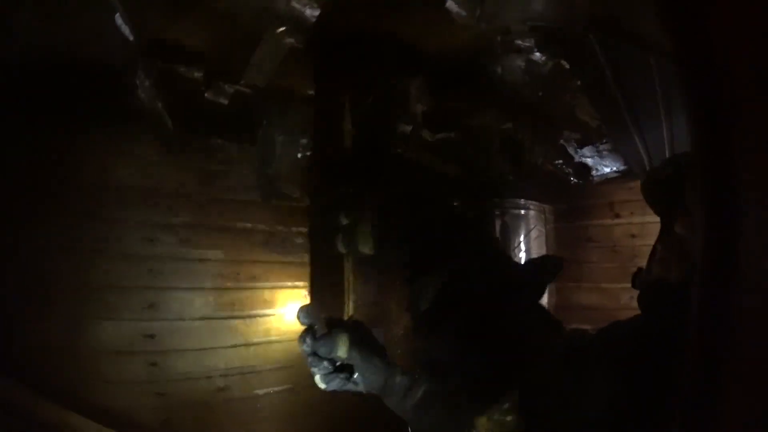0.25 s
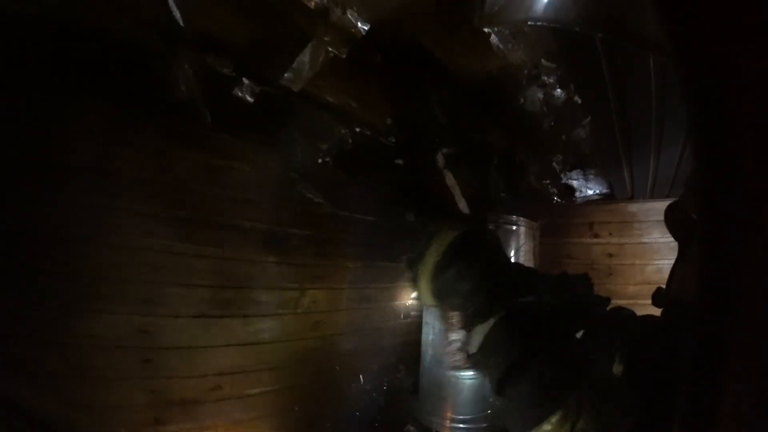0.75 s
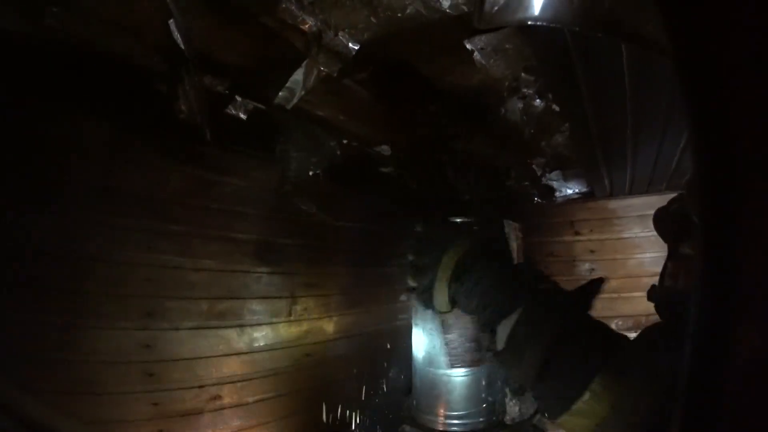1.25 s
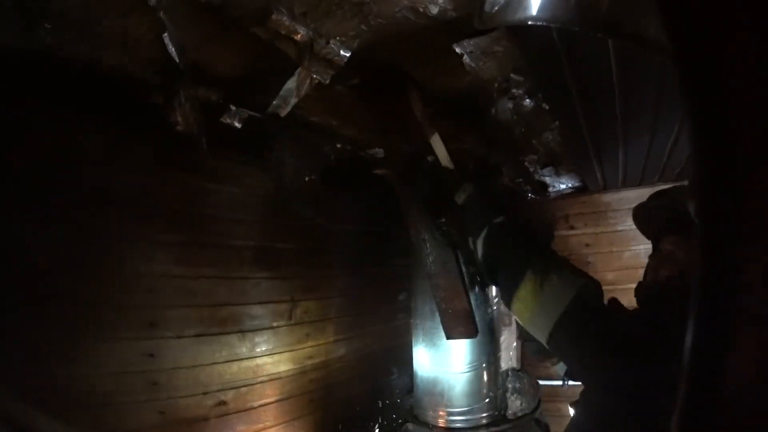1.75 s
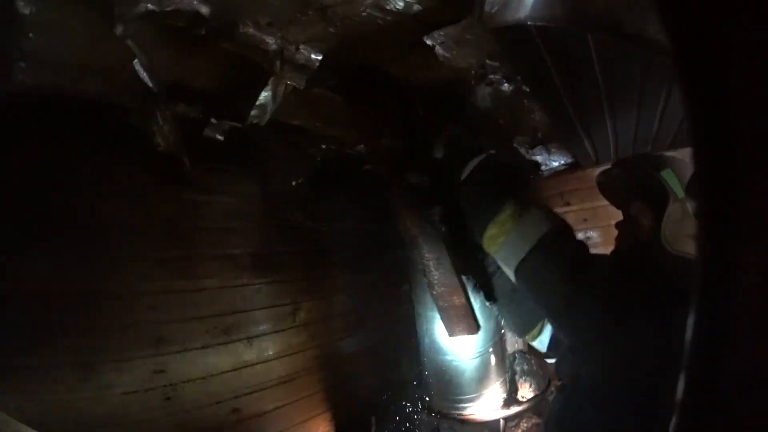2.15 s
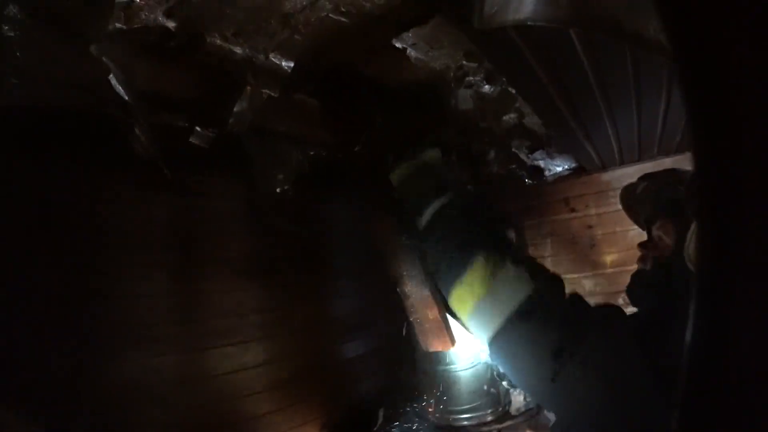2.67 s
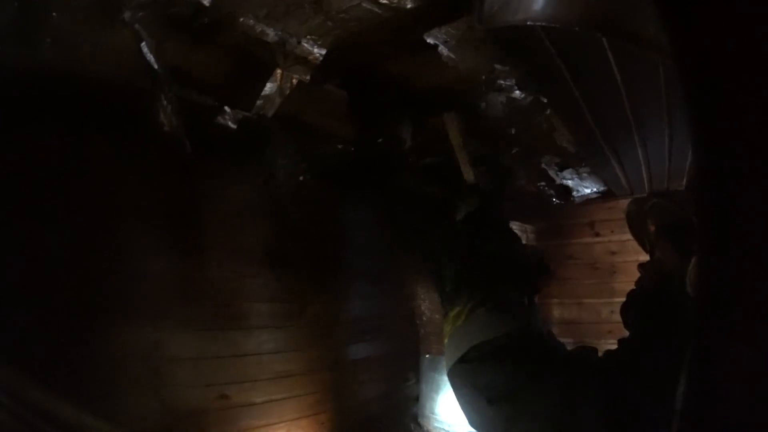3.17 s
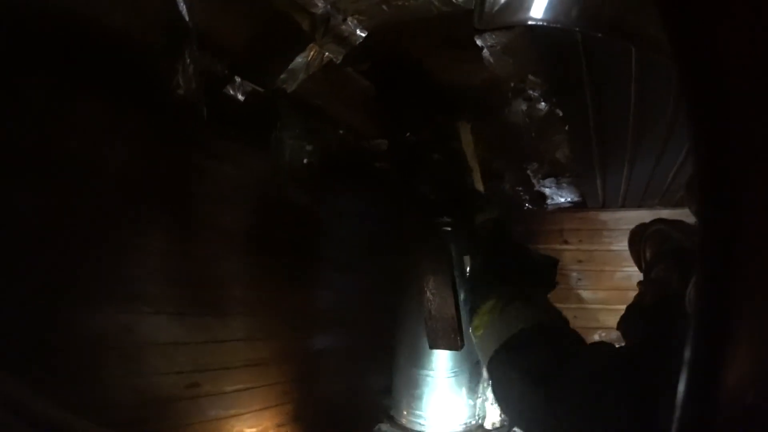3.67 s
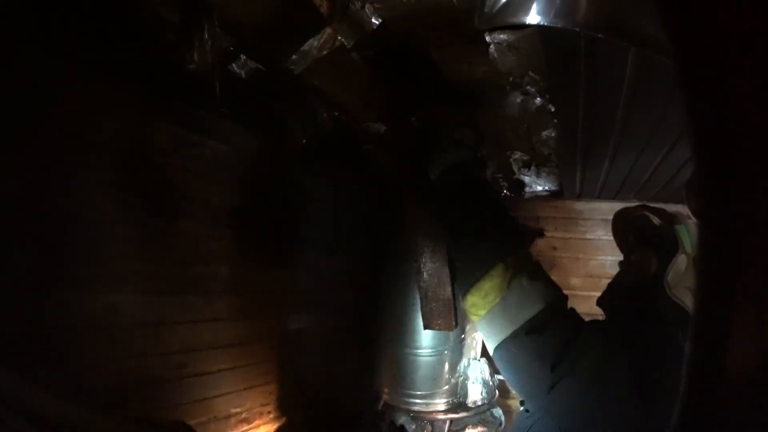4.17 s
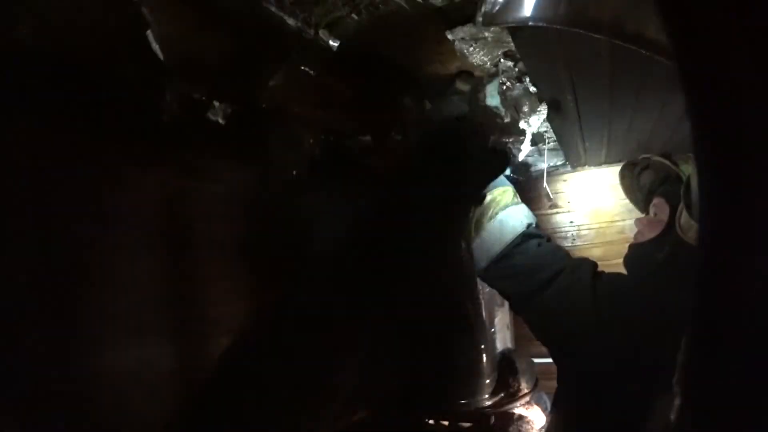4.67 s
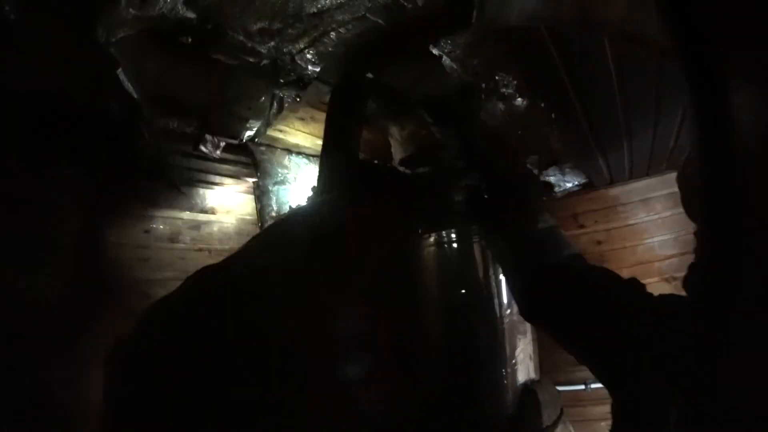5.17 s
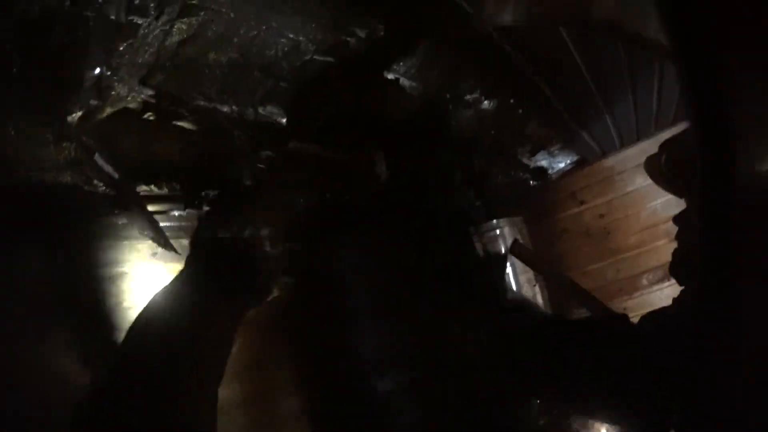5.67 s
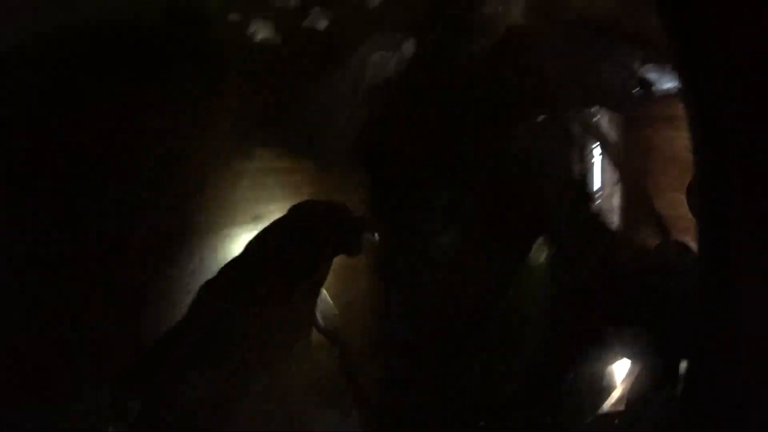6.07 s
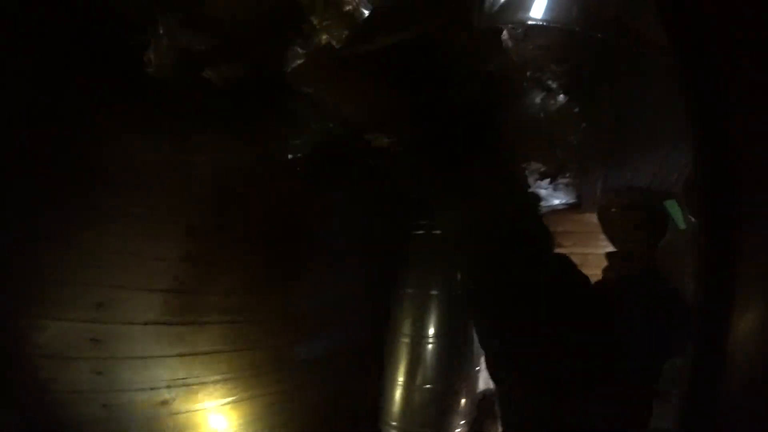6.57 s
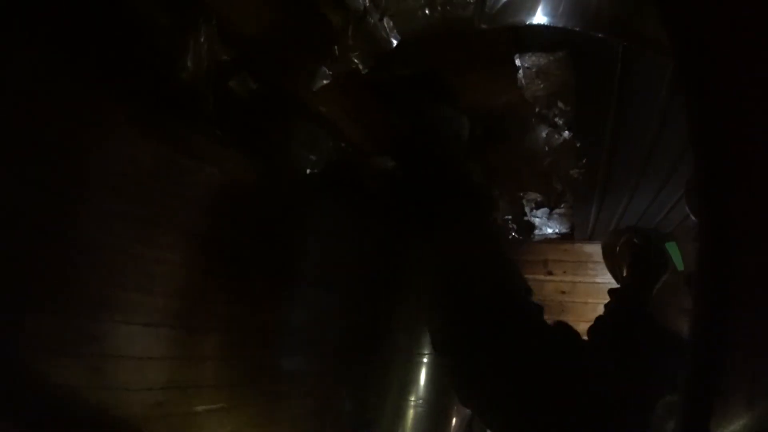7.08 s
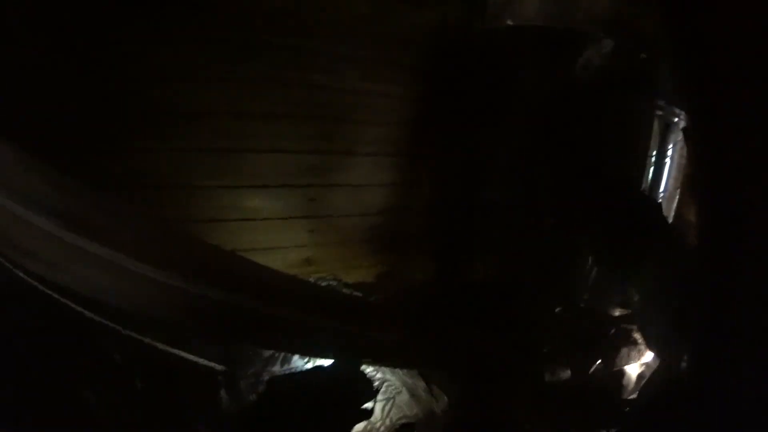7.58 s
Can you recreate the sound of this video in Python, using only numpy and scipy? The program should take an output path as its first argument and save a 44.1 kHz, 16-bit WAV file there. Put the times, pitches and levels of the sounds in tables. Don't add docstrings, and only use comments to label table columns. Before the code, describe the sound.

Close-up ceiling demolition: quick wooden knocks, snapping fibres and crackling foil, a quieter scratchy middle, then a loud cluster of blows and cracks.

```python
import sys
import numpy as np
from scipy import signal
from scipy.fft import rfft, irfft, next_fast_len
from scipy.io import wavfile
from scipy.ndimage import uniform_filter1d

SR = 44100
rng = np.random.default_rng(int(sys.argv[2]) if len(sys.argv) > 2 else 0)


def dump(signal):
    limited = np.clip(np.atleast_2d(signal).T, -1, 1)
    pcm = np.round(limited * 32767).astype(np.int16)
    wavfile.write(sys.argv[1], SR, pcm)


def nominal_scale(level):
    x = np.asarray(level, float) / 20
    return 10 ** x


N = 345303


def evened(x):
    return x / np.sqrt(np.mean(x ** 2) + 1e-20)


def read(points, hz):
    f, value = np.transpose(points)
    return np.interp(np.log(hz + 1), np.log(f + 1), value)


def add(mix, start_s, sound):
    part = mix[..., round(start_s * SR):][..., :sound.shape[-1]]
    part += sound[..., :part.shape[-1]]


def colour(x, spectrum):
    size = 4096
    gain_db = np.maximum(read(spectrum, abs(np.fft.fftfreq(size, 1 / SR))), -90)
    minimum_phase = np.exp(np.conj(signal.hilbert(np.log(nominal_scale(gain_db)))))
    taps = np.fft.ifft(minimum_phase).real[:size // 2]
    return signal.oaconvolve(x, (taps / np.linalg.norm(taps))[None], axes=-1)[..., :N]


def panned(db):
    return nominal_scale(np.array([db / 2, -db / 2]))


# (f/Hz, level/dB per Hz)
AIR = [(15, -49), (25, -0.5), (118, -23.5), (502, -13.5), (998, -16.5), (2370, -20), (7070, -19),
       (10900, -24)]


def air():
    shared, own = rng.standard_normal((1, N)), rng.standard_normal((2, N))
    same = 0.58
    return nominal_scale(-50.5) * colour(same * shared + np.sqrt(1 - same ** 2) * own, AIR)


# (t/s, peak level/dB, main pitch f/Hz, knock level re peak/dB, knock pitch f/Hz)
BLOWS = [(.169, -16, 281, 1.5, 1130), (0.468, -21, 275, -8, 1165), (0.523, -21, 306, 1.5, 1180),
         (.591, -26, 267, -16, 1560), (.713, -18.5, 258, -3.5, 1250), (.811, -21, 94, -8, 1153),
         (1.539, -28, 255, -4, 1690), (1.599, -34, 211, -30, 751), (2.127, -26.5, 123, -22, 570),
         (5.618, -4.5, 248, -15, 1200), (5.625, -9, 150, -30, 700), (3.348, -27, 321, -28, 1280),
         (3.767, -23, 241, -7, 1243), (4.059, -5.5, 265, -7, 450), (4.131, -33, 145, 2, 840),
         (5.477, -17.5, 310, -4, 1540), (5.598, -5.5, 305, -4, 812), (5.639, -7.5, 291, -16.5, 560),
         (5.964, -19.5, 349, 3.5, 1147), (6.117, -12, 148, -2, 594), (6.194, -12, 256, -0.5, 863),
         (6.714, -11.5, 265, -3, 900), (6.772, -24, 230, -1, 1360), (6.964, -37, 153, 7, 850),
         (7.312, -28, 308, -4, 1224), (.188, -20, 199, -4, 1200), (0.206, -34, 232, -10, 707),
         (4.077, -13, 150, -19, 690), (4.091, -17, 274.5, -28, 600), (4.11, -24, 150, -30, 600),
         (5.497, -20, 151, -7, 890), (5.513, -22.5, 266, -17, 694), (5.573, -20, 150, -20, 890),
         (5.654, -7.5, 310, -25, 600), (6.135, -13, 250, -1, 910), (6.745, -18.5, 202, -14, 690),
         (6.796, -20, 248, -16, 895), (0, -33, 326, -6, 960), (6.216, -17, 229, -10, 804)]
# (t/s, peak level/dB, knock pitch f/Hz)
TAPS = [(.342, -37, 1300), (2.535, -26, 778), (2.542, -32, 1900), (5.49, -15, 1800), (5.553, -22, 2070),
        (6.308, -28, 1214), (6.175, -11.5, 1123), (3.14, -39.5, 1550), (5.018, -35, 2250),
        (6.152, -16, 993), (6.385, -40, 690), (6.503, -21.5, 1116), (6.588, -27, 890), (6.617, -26, 843),
        (6.992, -22.5, 1230)]
# (f/Hz, level/dB, ring time as a share of the blow's [1])
BOARD_MODES = [(145, -2.5, 0.94), (195.5, -5, 1.25), (251.2, 1.5, 0.89), (290.8, 0.5, 0.93),
               (358.2, -3, 0.68), (454, -9.5, 0.22)]


def blows():
    out, t = np.zeros((1, N)), np.arange(SR // 3) / SR
    rise = 1 - np.exp(-t / 0.003)
    place = np.linspace(0, 1, num=14)[:, None]
    lowest_hz, highest_hz = 520, 2300
    sag, sag_s = 0.1, 0.012
    tap_db, tap_hz = -16.5, 310
    taps = [(s, db + tap_db, tap_hz, -tap_db, hz) for s, db, hz in TAPS]
    for s, peak_db, hz, knock_db, knock_hz in BLOWS + taps:
        detune, turn, vary = rng.uniform(-1.1, 1, (3, len(place), 1))
        t60 = max(0.15 - 0.0033 * (peak_db + max(knock_db, 0) + 19), 0.08)
        free = np.maximum(t - 0.098 * t60, 0)

        settling = sag * sag_s * (1 - np.exp(-t / sag_s))
        low = np.sin(2 * np.pi * hz * (t + settling)) * nominal_scale(4 - 60 * free / t60)
        for k, (f, db, share) in enumerate(BOARD_MODES):
            mode_db = db - 0.5 + 5.3 * vary[k] - 60 * free / (t60 * share)
            mode_hz = f * (1 + 0.059 * detune[k])
            low += nominal_scale(mode_db) * np.sin(2 * np.pi * mode_hz * t + 1.7 * turn[k])

        f = lowest_hz * (highest_hz / lowest_hz) ** place * (1 + 0.039 * detune)
        f[abs(f - knock_hz).argmin()] = knock_hz
        octaves = np.log2(f / knock_hz)
        tilt_db = -12 * np.maximum(octaves, -octaves / 3)
        near_db = 9 * np.exp(-(octaves / 0.12) ** 2)
        fall_db = 60 * t / t60 * (1.27 + place)
        rattle = uniform_filter1d(rng.standard_normal((len(place), len(t))), size=150)
        wobble = 1 + 0.45 * evened(rattle)
        modes = np.sin(2 * np.pi * f * t + np.pi * turn)
        high = (nominal_scale(tilt_db + near_db - fall_db) * wobble * modes).sum(0)
        high *= 1 - np.exp(-t / 0.00049)

        sound = rise * low / abs(rise * low).max() + nominal_scale(knock_db) * high / abs(high).max()
        add(out, s, nominal_scale(peak_db - 1.0) * sound[None])
    return out * panned(2.2)[:, None]


def grains(per_s, spread_db, ring_s, bed, apart=0.2):
    size_db = 2 * spread_db * np.minimum(rng.exponential(1, N), 4)
    snaps = nominal_scale(size_db) * (rng.random(N) < per_s / SR)
    power = signal.lfilter([1], [1, -np.exp(-1 / (ring_s * SR))], snaps)
    noise = rng.standard_normal(N) + apart * rng.standard_normal((2, N))
    return evened(np.sqrt(power / power.mean() + bed) * noise)


def patchy(x, patchy_db, size):
    z = signal.stft(x, nperseg=size)[2]
    patches = uniform_filter1d(rng.standard_normal(z.shape[1:]), size=9, axis=0)
    patches = uniform_filter1d(patches, size=7, axis=1)
    out = signal.istft(z * nominal_scale(patchy_db * evened(patches)), nperseg=size)[1][:, :N]
    return out / np.exp((patchy_db * np.log(10) / 20) ** 2)


def bursts(rows, rise_db_per_s, fall_db_per_s):
    s, hold, level_db, other_db = np.transpose(rows)[..., None]
    t = np.arange(0, N + 32, 32) / SR
    rise_db = rise_db_per_s * np.maximum(s - t, 0)
    fall_db = fall_db_per_s * np.maximum(t - s - hold, 0)
    shape_db = level_db - rise_db - fall_db
    layers_db = (shape_db, shape_db + other_db)
    return [np.interp(np.arange(N) / SR, t, (nominal_scale(db) ** 2).sum(0)) for db in layers_db]


# (t/s, effort level/dB)
EFFORT = [(0, -39), (.75, -42.5), (1.05, -44), (1.6, -52.5), (1.75, -51.5), (1.95, -46), (2.25, -50),
          (3.1, -45), (3.3, -53), (3.72, -57.5), (4.25, -50), (4.6, -40), (4.8, -38), (5.5, -36.5),
          (6.9, -38), (7.25, -44.5), (7.449, -43), (7.65, -46.5)]


def worked(middle_db, db_per_db, burst_power):
    effort_db = np.interp(np.arange(N) / SR, *np.transpose(EFFORT)) + 45
    return np.sqrt(nominal_scale(middle_db + db_per_db * effort_db) ** 2 + burst_power)


# (start t/s, hold t/s, crackle level/dB, scrape level re crackle/dB)
PULLS = [(.11, 0.084, -35, -6), (2.36, .09, -42.5, -13), (.35, 0.053, -39, -25), (.599, 0.023, -34, -5),
         (.67, 0.061, -36, -9), (.815, 0.032, -25.5, -10.5), (.905, 0.027, -33, -13),
         (1.535, 0.0086, -32, -21), (2.12, 0.029, -45, -7), (3.055, .12, -39, -28), (3.39, 0.074, -30, -20),
         (3.771, 0.028, -30.5, -12.5), (3.83, 0.094, -30.5, -11.5), (3.95, 0.046, -41, -5),
         (4.059, 0.017, -36.5, -3.5), (4.133, 0.0065, -35.5, -2.5), (4.657, 0.0091, -31, -27),
         (4.72, 0.13, -33, -12), (5.075, 0.035, -30, -24), (5.11, 0.057, -21.5, -16.5),
         (5.29, 0.089, -40, -25), (5.575, .02, -24, -18), (3.443, .04, -36, -20), (.62, .06, -44, 4),
         (3.57, .02, -50, -15), (5.52, 0.03, -26.5, -13), (5.603, 0.042, -46, 11),
         (5.962, 0.034, -27, -1.5), (6.105, 0.085, -32, 9), (6.304, 0.086, -43.5, 4.5),
         (6.501, 0.094, -32.5, -1), (6.663, 0.065, -41.5, 6.5), (6.74, .17, -40, 0),
         (7.782, .05, -31.5, -7), (1.145, 0.027, -41.5, -18), (1.27, 0.056, -44.5, -13),
         (1.005, 0.027, -41.5, -11), (6.338, 0.02, -41.5, -6), (5.555, 0.018, -25.5, -12),
         (5.69, 0.015, -34, -19), (6.56, 0.052, -38, 4), (6.715, 0.015, -34, 6), (6.92, 0.035, -39, -9),
         (6.988, 0.026, -42, 1.5), (2.537, .006, -46, -6), (7.4, 0.061, -47, -6), (5.19, 0.049, -34, -25),
         (4.82, 0.05, -39, -10), (.278, 0.022, -42, -21)]
# (start t/s, hold t/s, groan level/dB, deep rumble level re groan/dB)
HEAVES = [(0, 0.007, -40.5, -11), (.12, 0.056, -36.5, -9.5), (.59, 0.076, -39.5, -5), (.72, 0.042, -38, -9),
          (.82, 0.099, -40.5, -2.5), (1.0, .2, -55, 2.5), (1.545, 0.038, -50, 12),
          (1.94, 0.023, -43.5, -1.5), (2.13, 0.017, -43.5, 10.5), (3.05, 0.13, -48, -8),
          (3.355, 0.079, -49.5, 7), (3.775, 0.17, -39.5, -6.5), (4.062, 0.013, -26, 6),
          (4.5, 0.18, -50, -22), (5.1, 0.055, -37.5, -4), (5.24, 0.047, -57, 10), (5.44, 0.042, -32.5, -9),
          (5.53, 0.087, -36.5, -1), (5.69, .05, -36.5, -5), (5.61, 0.044, -30, 4),
          (5.79, 0.12, -37.5, -8.5), (5.97, 0.078, -28.5, -2), (6.11, 0.028, -25.5, 3.5),
          (6.17, 0.05, -27.5, -4), (6.28, 0.12, -43.5, 3.5), (6.52, 0.097, -33, -0.5),
          (6.72, 0.11, -27.5, -5.5), (6.84, 0.095, -33.5, 1.5), (7.05, 0.11, -50, -3),
          (7.315, 0.026, -45, -3), (7.79, .04, -40, -4), (.3, 0.025, -49, -5), (.39, 0.038, -50, -1),
          (4.15, .03, -42, -9), (4.2, .04, -48.5, 1), (6.93, 0.032, -40, 3), (2.45, 0.032, -55.5, 2),
          (2.62, 0.027, -51, -2), (.5, .06, -48, -9)]
# (f/Hz, level/dB per Hz)
CRACKLE = [(710, -45.5), (1200, -17), (1890, -13.5), (2510, -9), (3080, -8), (4330, -4.5), (6380, -0.5),
           (10900, -9)]
# (f/Hz, level/dB per Hz)
SCRAPE = [(300, -41), (480, -10.5), (700, -7.5), (1100, -6), (1800, -5), (2300, -11), (3300, -11.5),
          (5500, -45.5)]
# (f/Hz, level/dB per Hz)
HOUSING = [(100, -44), (170, -8.5), (247, -2.5), (329, 2), (416, -13.5), (500, -36), (650, -25),
           (1100, -120)]
# (f/Hz, level/dB per Hz)
DEEP = [(12, -63), (20, -14), (103, -1.5), (135, -0.5), (156, -2.5), (220, -4), (290, -26), (480, -120)]


def rustle():
    torn, scraped = bursts(PULLS, 1500, 381)
    loaded, shaken = bursts(HEAVES, 900, 215)
    foil = patchy(grains(450, 2.9, 0.0013, 0.8, apart=0.5), 3.2, size=256)
    wood = patchy(grains(220, 2.2, 0.003, 1.0, apart=0.42), 2.9, size=512)
    crackle = colour(worked(-45, 0.87, torn) * foil, CRACKLE)
    scrape = colour(worked(-51, 0.88, scraped) * wood, SCRAPE)
    groan = colour(worked(-51.5, 0.58, loaded) * grains(70, 1.5, 0.005, 1.1, apart=0.14), HOUSING)
    rumble = colour(worked(-56.5, 0.25, shaken) * grains(30, 3, 0.01, 0.8), DEEP)
    return crackle + scrape, groan + rumble


# (t/s, peak level/dB, ring f/Hz, woody level re peak/dB)
SNAPS = [(.3406, -32, 5660, 3), (0.3864, -14.5, 5940, -25), (.599, -13.5, 7100, -21),
         (.672, -19.5, 6750, -24), (1.537, -24, 4310, -3.5), (3.0567, -17.5, 6460, -28),
         (3.4189, -14.5, 7040, -16), (3.8851, -13.5, 6000, -35), (4.0589, -6.5, 5700, -11.5),
         (4.4198, -22, 6280, -12), (4.6565, -13, 5460, -16), (4.7084, -18, 9000, -28),
         (4.72, -13, 7900, -27), (4.9388, -12.5, 4450, -21), (5.1125, -10, 6000, -15),
         (5.164, -10, 6750, -12), (5.2951, -5.5, 6750, -36), (5.3225, -11, 5900, -30),
         (5.341, -5.5, 7140, -43), (5.357, -14, 8500, -25), (5.4822, -7, 5140, -9), (5.5203, -8, 7200, -20),
         (5.55, -10, 4540, -27), (5.634, -21, 5900, -28), (5.8817, -11, 4500, -18),
         (5.921, -8, 4870, -16.5), (5.9882, -5, 2970, -11), (6.1034, -21, 2800, 7),
         (6.304, -17.5, 2730, 1.5), (6.717, -8, 2600, -5.5), (5.14, -20, 6200, -11),
         (5.154, -12, 6500, -18), (5.43, -27, 4400, -12), (5.256, -20, 7000, -30), (5.268, -18, 7500, -30),
         (5.278, -18, 8000, -30), (5.22, -24, 7000, -27), (0.149, -14, 6680, -20), (0.8023, -23, 5890, -9),
         (0.9016, -25, 6550, -23), (1.4406, -30, 7500, -27), (6.3386, -17, 7000, -15),
         (6.129, -16, 6500, -10), (6.17, -18, 4000, -10), (5.855, -38, 7650, -25), (5.96, -18, 3000, 0),
         (6.4628, -33, 6830, -18), (5.5951, -12, 8600, -17), (.0852, -25, 5030, -18),
         (0.7126, -34, 6260, -13)]
# (t/s, peak level/dB, ring f/Hz, woody level re peak/dB)
SPLITS = [(0.0557, -25, 6170, -30), (.113, -15, 6460, -21), (0.17, -17, 7500, -15),
          (0.2778, -19, 4900, -36), (0.298, -21.5, 5600, -30), (0.8165, -14.5, 6150, -19),
          (1.004, -27, 4530, -6.5), (1.3707, -31, 6530, -12), (1.41, -29.5, 2270, -29),
          (1.4719, -25, 2980, -13), (2.5373, -29.5, 3190, -18), (5.128, -13, 6030, -14),
          (2.7821, -24, 7040, -35), (2.9479, -25, 7100, -16), (3.351, -25, 7200, -3),
          (3.444, -21, 7400, -31), (3.769, -13, 6960, -17), (4.8194, -15, 6600, -12.5),
          (4.9652, -19.5, 5330, -19), (5.0724, -22, 4700, -29), (5.3865, -15, 8400, -22),
          (5.589, -22, 7000, -18), (5.694, -17, 7060, -32), (6.194, -17.5, 6480, -6),
          (6.5004, -11, 9600, -23), (6.666, -22, 6500, -3), (6.9182, -19.5, 3060, -27),
          (6.9886, -20, 5950, -5), (7.315, -24.5, 4200, -31), (7.7831, -19.5, 5600, -5)]
# (t/s, peak level/dB)
TICKS = [(2.378, -33), (2.605, -28), (2.7606, -34), (2.842, -26), (2.8807, -25), (2.97, -27), (3.1752, -35),
         (1.5983, -32), (1.7404, -41), (1.7963, -31), (1.9405, -25), (2.0023, -31), (2.0472, -43),
         (2.1266, -40), (3.3034, -32), (.2478, -37), (5.8348, -33), (6.4159, -28)]


def cracks():
    bright, woody, t = np.zeros((2, N)), np.zeros((2, N)), np.arange(3000) / SR
    snap_tail_db, split_tail_db = -19, -9
    rows = [(*row, snap_tail_db) for row in SNAPS]
    rows += [(*row, split_tail_db) for row in SPLITS]
    rows += [(s, db, 6600, -27, snap_tail_db) for s, db in TICKS]
    for s, peak_db, hz, wood_db, tail_db in rows:
        a, b, c = rng.standard_normal((3, len(t)))
        gain = nominal_scale(peak_db) * panned(1.6 * c[0])[:, None]
        ring = evened(signal.lfilter([1], [1, -1.6 * np.cos(2 * np.pi * hz / SR), 0.64], a))
        snap = (0.65 * a + ring) * np.exp(-t / 0.00043)
        tail = nominal_scale(tail_db) * (c + 0.69 * ring) * np.exp(-t / 0.01)
        add(bright, s, gain * (snap / abs(snap).max() * 1.23 + tail))
        add(woody, s, gain * nominal_scale(wood_db) * b * np.exp(-t / 0.009))
    return nominal_scale(-3.0) * colour(bright, CRACKLE) + nominal_scale(-6.5) * colour(woody, SCRAPE)


# (t/s, level/dB)
TEAR = [
    (3.775, -43),
    (3.789, -29),
    (3.83, -45),
    (3.9, -26.5),
    (3.94, -68),
    (3.97, -70),
]


def tear():
    hz, width_hz = 3060, 980
    r = np.exp(-np.pi * width_hz / SR)
    fibres = grains(300, 1.3, 0.0024, 0.67)
    ring = signal.lfilter([1, 0, -1], [1, -2 * r * np.cos(2 * np.pi * hz / SR), r * r], fibres)
    s, level_db = np.transpose(TEAR)
    return nominal_scale(np.interp(np.arange(N) / SR, s, level_db, -120, -120)) * evened(ring)


# (f/Hz, t to fall 60 dB/s)
ROOM = [(100, 0.034), (300, 0.44), (1000, 0.25), (4000, 0.2), (10000, 0.09)]


def room(x):
    taps = np.zeros((2, SR // 2))
    starts = np.arange(100, SR // 2 - 20, 20)
    at = starts + rng.integers(0, 20, (2, len(starts)))
    np.put_along_axis(taps, at, rng.choice([-1., 1.], at.shape), 1)
    hz, t, z = signal.stft(taps, SR, nperseg=256)
    fall_db = -60 * t / np.maximum(read(ROOM, hz), 0.02)[:, None]
    tail = signal.istft(z * nominal_scale(fall_db), SR, nperseg=256)[1]
    tail[:, :100] = 0
    return signal.fftconvolve(x, tail / np.linalg.norm(tail[0]), axes=1)[:, :N]


def scene():
    bright, low = rustle()
    bright = bright + cracks() + tear()
    low = low + blows()
    return bright + low + room(nominal_scale(-10.0) * bright + nominal_scale(-25.5) * low) + air()


def top_cut(x):
    return signal.sosfilt(signal.butter(12, 12370, fs=SR, output="sos"), x)


# (f/Hz, left minus right level/dB)
PORT_LEVEL = [(30, -.5), (70, 1.5), (300, 1.3), (700, 1.3), (1500, -.2), (9000, -.4), (12000, 2)]
# (f/Hz, phase/radians)
PORT_PHASE = [(30, .4), (150, .6), (500, .55), (1500, .5), (2200, .9), (4100, .2), (10000, .4)]
# (f/Hz, level/dB)
LEAK = [(11000, -6), (11500, -18), (12000, -25), (13000, -31), (15000, -44), (17000, -70)]


def record(dry):
    limit_db, squeeze, recover_db_per_s, edge_hz = -15, 0.35, 140, 11070
    power_db = 10 * np.log10(abs(uniform_filter1d((dry ** 2).mean(0), size=200)) + 1e-12)
    fall_db = np.arange(N) * recover_db_per_s / SR
    held_db = np.maximum.accumulate(power_db + fall_db) - fall_db
    over_db = np.maximum(held_db - limit_db, 0)
    limited = dry / nominal_scale(squeeze * uniform_filter1d(over_db, size=120))

    size = next_fast_len(N + 4096)
    hz = np.fft.rfftfreq(size, 1 / SR)
    half = nominal_scale(read(PORT_LEVEL, hz) / 2) * np.exp(0.5j * read(PORT_PHASE, hz))
    ported = rfft(limited, size) * np.array([half, 1 / half])
    below = irfft(ported * (hz < edge_hz), size)[:, :N]
    above = irfft(ported * (hz >= edge_hz) * nominal_scale(read(LEAK, hz)), size)[:, :N]

    power = (above ** 2).mean(0)
    quick, slow = (abs(uniform_filter1d(power, size=n)) + 1e-11 for n in (130, 2600))
    opened = uniform_filter1d(1. * (quick > 5.5 * slow), size=400)
    return top_cut(below + np.minimum(2.7 * opened, 1) * above)


dry = scene()
out = record(dry)
dump(out)
```